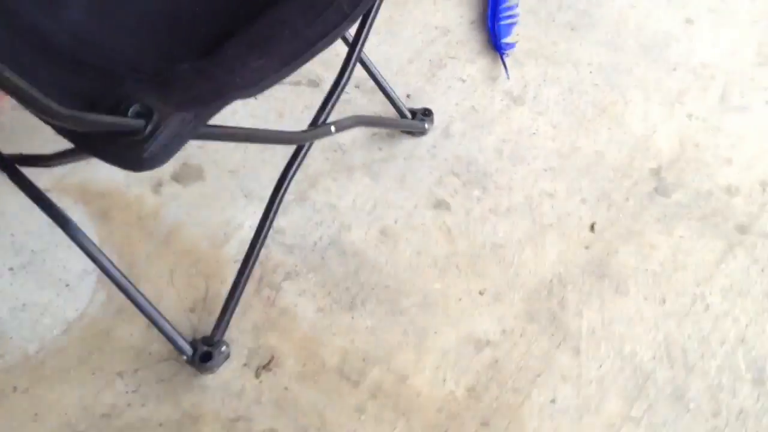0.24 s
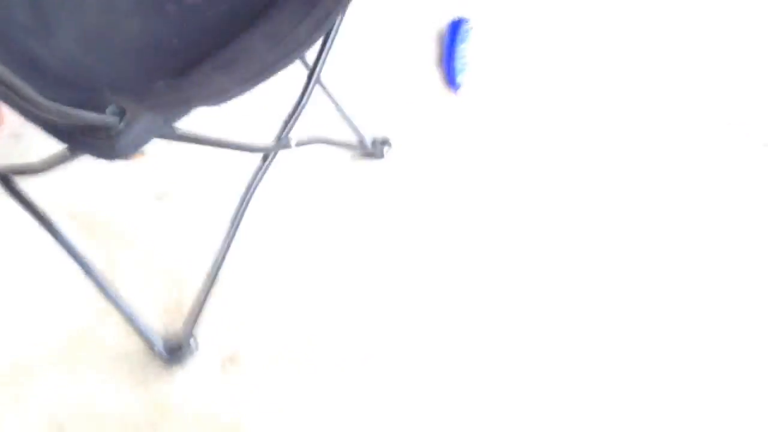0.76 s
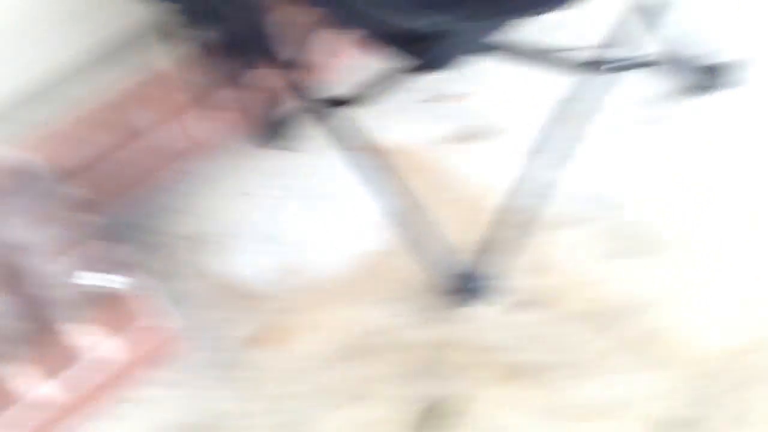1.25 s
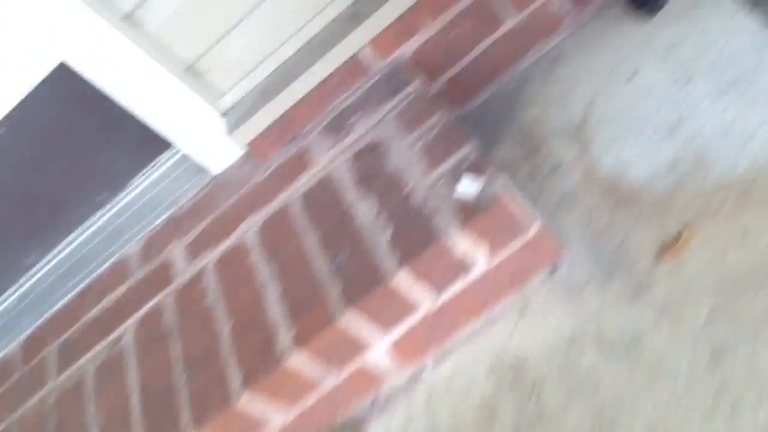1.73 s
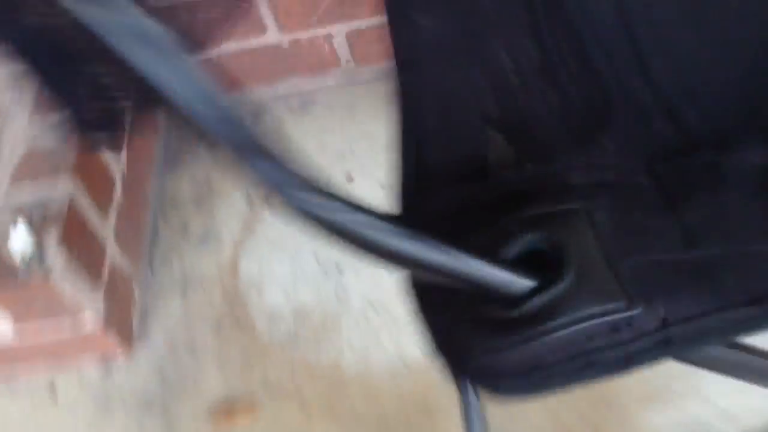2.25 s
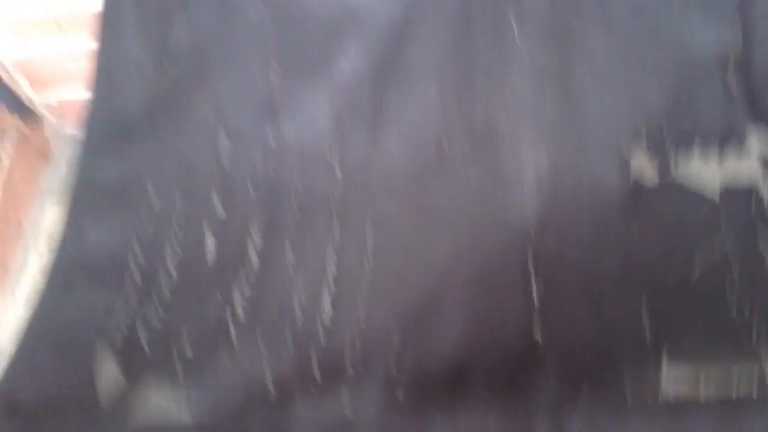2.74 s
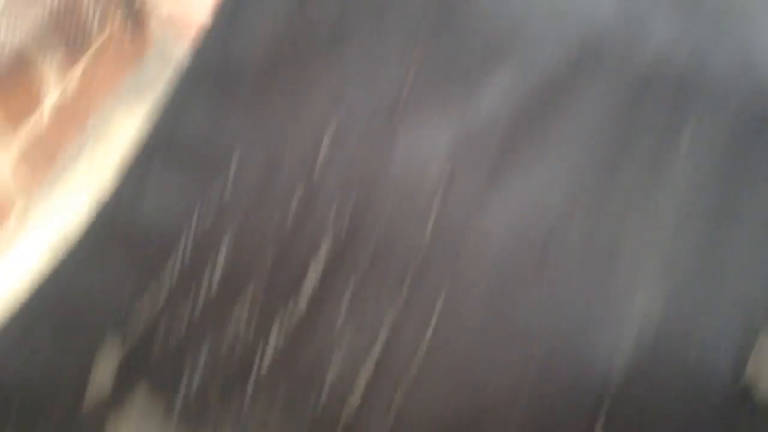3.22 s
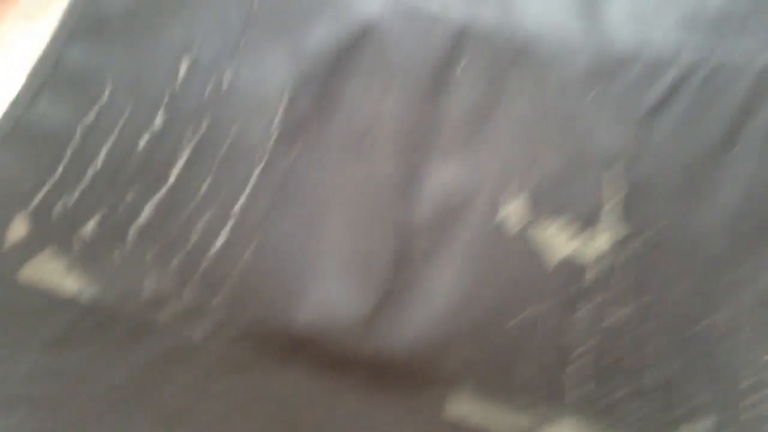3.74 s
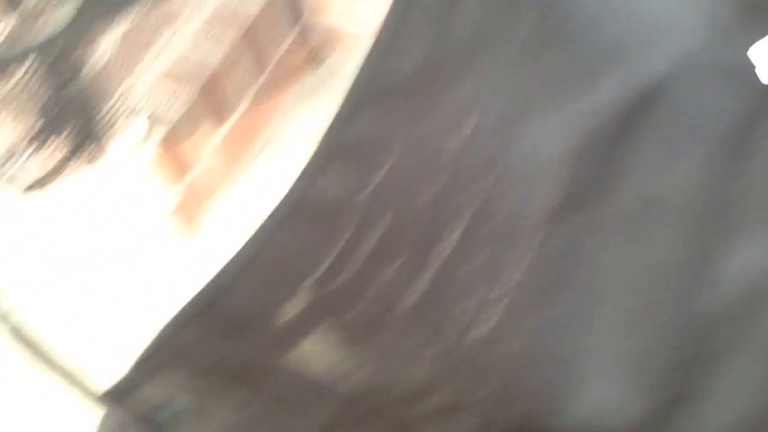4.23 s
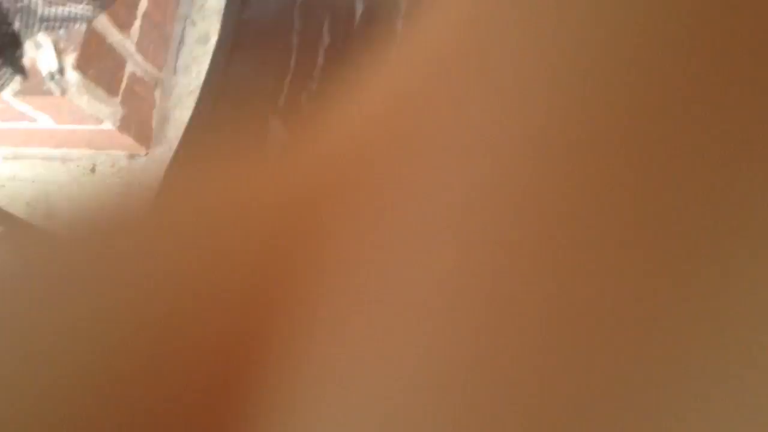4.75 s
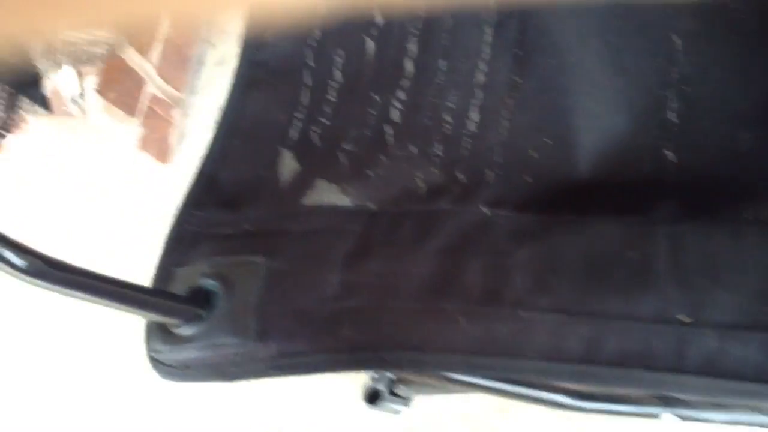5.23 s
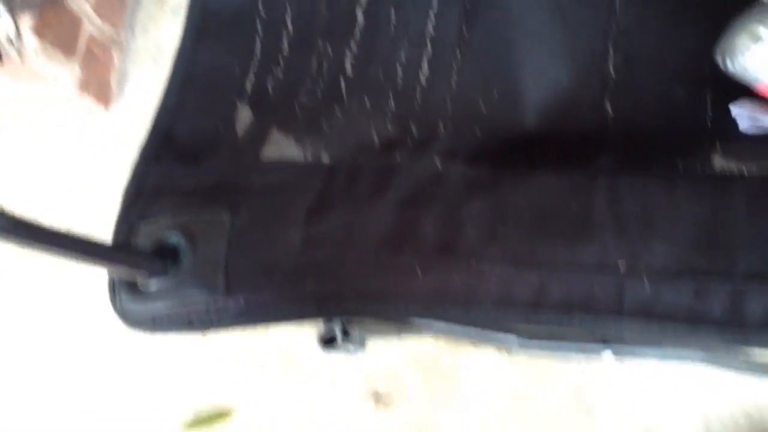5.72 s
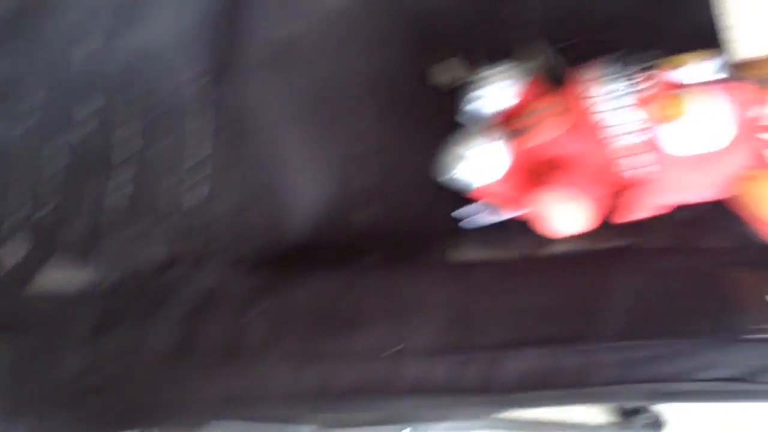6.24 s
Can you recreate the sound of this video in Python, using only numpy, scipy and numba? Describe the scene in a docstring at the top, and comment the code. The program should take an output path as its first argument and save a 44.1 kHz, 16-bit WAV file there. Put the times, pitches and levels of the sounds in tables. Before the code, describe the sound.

Very quiet outdoor air on a porch lies under everything. From about 0.6 to 1 second, fingers knock and rub on the handheld microphone in two loud, close, slightly overloaded clusters. Faint ticks and a soft cloth swish follow. At 2.4 seconds a plastic toy lands in a canvas folding chair with a clack and a thud, along with a handling bump, and fabric rasps faintly until 3 seconds. At 3.3 seconds a second toy lands much harder, thudding on the seat and briefly ringing the steel frame. A third, lighter drop comes at 4.3 seconds. Near 4.9 seconds a finger wipes across the microphone with a short, loud, muffled roar, followed by faint bumps as the grip shifts. Sharp, loud knocks and snaps hit the microphone around 5.8 to 5.9 seconds, then softer dull thumps continue until about 6.4 seconds.

```python
"""Toys dropped into a canvas chair

A handheld camera is carried across a porch while three toys land in a folding chair.
Each toy clacks, thuds on the canvas seat and rings the steel frame. Fingers knock, rub and slide
on the camera body and overload its microphone. Cloth swishes and small things tick in quiet air."""
import sys
import numpy as np
from scipy import signal
from scipy.fft import rfft, irfft
from scipy.io import wavfile
from scipy.ndimage import uniform_filter1d
from numba import njit

SR = 44100
rng = np.random.default_rng(int(sys.argv[2]) if len(sys.argv) > 2 else 0)


def file_out(sig):
    """Save sig as 16-bit WAV at sys.argv[1]."""
    # one column per channel
    cols = np.atleast_2d(sig).T
    # limit, then scale
    lim = np.clip(cols, -1, 1)
    pcm = np.round(lim * 32767).astype(np.int16)
    wavfile.write(sys.argv[1], SR, pcm)


N = 285755
T = np.arange(N) / SR
BASS_CUT_HZ, TOP_HZ = 142, 15200  # the range the microphone hears well
LEAD_S = 0.008  # a push starts this long before its peak


def amp(db):
    """Turn decibels into a gain."""
    return 10 ** (np.asarray(db) / 20)


def unit(x):
    """Scale a sound to an average (rms) level of 1."""
    return x / np.sqrt(np.mean(x ** 2))


def add(out, start, x):
    """Mix x into out, beginning at start seconds."""
    i = int(start * SR)
    out[i:i + len(x)] += x[:len(out) - i]


def fade(t60, size, hold_s=0):
    """Hold steady, then die away. The fade time t60 is the seconds it takes to fall 60 dB."""
    return amp(-60 * np.maximum(T[:size] - hold_s, 0) / t60)


def noise(colour, size, tilt_db=0):
    """Noise shaped by a table of Hz and dB, and brightened by tilt_db per octave."""
    octaves = np.log2(np.maximum(np.fft.rfftfreq(size, 1 / SR), 1))
    hz, db = np.transpose(colour)
    gains = amp(np.interp(octaves, np.log2(hz), db + tilt_db * np.log2(hz)))
    return unit(irfft(rfft(rng.standard_normal(size)) * gains, size))


def band(hz, width_hz, size):
    """Noise gathered around one pitch."""
    resonance = signal.iirpeak(min(hz, TOP_HZ), hz / width_hz, SR)
    return unit(signal.lfilter(*resonance, rng.standard_normal(size)))


def wander(rate, size):
    """A wobbly line that heads for a new random value rate times a second."""
    points = rng.standard_normal(int(size / SR * rate) + 2)
    return np.interp(T[:size] * rate, np.arange(len(points)), points)


@njit
def muffle(x, hz):
    """Soften the treble above a cutoff that can move over time."""
    y, state = np.empty(len(x)), 0.
    for i in range(len(x)):
        state += (1 - np.exp(-2 * np.pi * hz[i] / SR)) * (x[i] + 1e-18 - state)
        y[i] = state
    return y


def bass_cut(x):
    """The camera's steep bass filter, which rings after every push."""
    return signal.sosfilt(signal.butter(5, BASS_CUT_HZ, "high", fs=SR, output="sos"), x)


def push(cutoff_hz, size=2048):
    """A bell-shaped pulse. A softer push lasts longer and has a lower cutoff."""
    return np.exp(-(2 * np.pi * cutoff_hz * (T[:size] - LEAD_S)) ** 2 / np.log(4))


def thump(cutoff_hz):
    """One push on the camera body, heard through the bass cut, with a peak of 1."""
    x = bass_cut(-push(cutoff_hz))
    return x / np.abs(x).max()


# The tone of the outdoor air. Each row: frequency in Hz, level in dB.
AIR_COLOUR = [(24, -63), (40, -30), (108, -7.5), (273, -3), (387, -8), (472, -6.5), (591, -8), (1410, -12),
              (1860, -15.5), (3930, -18.5), (15500, -27.5)]
# Notes of the cupped hand. Each row: pitch in Hz, width in Hz, final level in dB, swell up to it in dB.
HAND_HOLLOW = [(150, 57, -48.5, 0), (3120, 290, -62, 2.5), (5066, 590, -65.5, 12.5)]


def outdoor_air(air_db=-54.5, shade_db=-2.5, shade_s=0.56, cup_start=4.82, cup_end=5.82):
    """Quiet air dips as a hand cups the microphone, and rings in the hollow as the grip closes."""
    shade = np.clip((T - cup_start) / shade_s, 0, 1)
    air = noise(AIR_COLOUR, N) * amp(air_db + shade_db * shade - 0.56 * wander(14, N))
    cupped = uniform_filter1d(1. * ((T > cup_start) & (T < cup_end)), size=4000)
    slack = np.interp(T, [cup_start, cup_end], [1, 0])
    hollow = sum(amp(db - swell_db * slack) * band(hz, width_hz, N)
                 for hz, width_hz, db, swell_db in HAND_HOLLOW)
    return air + cupped * bass_cut(hollow)


# Small contacts. Each row: start in seconds, level in dB, pitch in Hz, fade time in seconds.
LIGHT_TICKS = [(0.064, -45, 1550, 0.064), (1.626, -48, 3250, 0.069), (1.685, -39.5, 7400, 0.035),
               (1.699, -42, 10900, 0.11), (1.806, -48, 7550, .05), (1.937, -45.5, 6680, 0.06),
               (2.1248, -40.5, 1380, 0.045), (2.184, -43.5, 1420, 0.16), (2.535, -44.5, 9500, 0.13),
               (3.444, -39, 11300, 0.091), (4.3009, -24.5, 9200, 0.0047), (5.053, -46, 2980, .02),
               (5.191, -52, 7370, 0.022), (5.24, -43, 5870, 0.022), (5.402, -39.5, 3400, 0.041),
               (5.988, -37, 1100, 0.006), (6.1713, -41, 1290, 0.009), (6.37, -44, 850, 0.053)]


def ticks(size=8192):
    """Plastic, fingernails and grit touch lightly, each with a broad ring that dies quickly."""
    out = np.zeros(N)
    for start, db, hz, t60 in LIGHT_TICKS:
        add(out, start, amp(db) * band(hz, min(0.37 * hz, 6000), size) * fade(t60, size))
    return out


# The tone of brushed cloth. Each row: frequency in Hz, level in dB.
CLOTH_COLOUR = [(150, -14), (700, -6.5), (1600, -2.5), (2600, -3), (3900, -0.5), (6500, -7), (9000, -5),
                (15000, -23)]
# Brushes. Each row: start, rise and fall in seconds, level in dB, tilt in dB per octave.
CLOTH_BRUSHES = [(0.025, 0.066, 0.27, -57, -6), (0.693, 0.033, 0.097, -40.5, 0), (1.6, 0.31, 0.41, -54, -4),
                 (2.12, 0.036, 0.12, -46, -1), (2.68, 0.21, 0.078, -43, 0), (2.96, 0.081, 0.033, -49, -4),
                 (3.201, 0.0054, 0.063, -33.5, 0), (3.208, 0.079, 0.12, -48.5, -2),
                 (4.155, .008, 0.028, -52.5, 8), (4.745, 0.013, 0.2, -50.5, 5.5)]


def swishes(weave_db=2.5, size=32768):
    """Canvas and clothes brush past: each swish swells and dies away, grainy with the weave."""
    out = np.zeros(N)
    for start, rise, fall, db, tilt_db in CLOTH_BRUSHES:
        speed = np.interp(T - start, [0, rise, rise + fall], [0, 1, 0])
        grain = noise(CLOTH_COLOUR, size, tilt_db) * amp(weave_db * wander(300, size))
        out += amp(db) * speed * np.resize(grain, N)
    return out


def rasp(hz, width_hz):
    """Threads scraping: noise gathered around a pitch that moves."""
    a, b = signal.lfilter(*signal.butter(2, width_hz / 2, fs=SR), rng.standard_normal((2, N)))
    phase = 2 * np.pi * np.cumsum(hz) / SR
    return unit(a * np.cos(phase) + b * np.sin(phase))


def sleeve_slide(start=2.55, peak=2.875, end=2.95, db=-43.5, weave_db=2.5, snag_db=2):
    """A sleeve snags along the canvas, pressing harder and rasping higher as it speeds up."""
    contact = np.interp(T, [start, peak, end], [1, 1, 0], left=0)
    pressure = contact * amp(32 * np.minimum(T - peak, 0))  # swells 32 dB a second
    hz = 3730 * 2 ** (0.45 * (np.clip(T, start, peak) - start))  # climbs 0.45 octaves a second
    threads = rasp(hz, width_hz=2300) + amp(-9.5) * rasp(2 * hz, width_hz=3200)
    return amp(db + weave_db * wander(300, N) + snag_db * wander(45, N)) * pressure * threads


def fidget(start=4.5, end=5.8, db=-40, cutoff_hz=159, count=20):
    """Faint bumps of uneven spacing, strength and sharpness as the hand shifts its hold."""
    out = np.zeros(N)
    for k, (late, strength, sharpness) in enumerate(rng.standard_normal((count, 3))):
        at = start + (end - start) * (k + late / 2) / count
        add(out, at, amp(db + 3 * strength) * thump(cutoff_hz * np.exp(0.25 * sharpness)))
    return out


def judder(at=6.0925, first_gap_s=0.0175, slowing=1.25, first_db=-24, step_db=1.15):
    """A fingertip judders to a stop in four slips, each stronger and after a longer wait."""
    out = np.zeros(N)
    for k in range(4):
        add(out, at - LEAD_S, amp(first_db + k * step_db) * thump(cutoff_hz=153))
        at += first_gap_s * slowing ** k
    return out


# Soft contacts. Each row: time in seconds, peak level in dB, cutoff in Hz (lower is duller).
SOFT_BUMPS = [(0.064, -40, 260), (0.168, -42, 170), (0.328, -40.5, 167), (0.444, -29.5, 447),
              (0.575, -37.5, 217), (0.6376, -5, 697), (0.658, -8, 260), (0.6737, -14, 634),
              (.788, -24, 300), (0.863, -28, 330), (0.882, -4, 340), (.926, -11, 650), (1.179, -44.5, 186),
              (2.375, -13, 644), (2.383, -11, 200), (2.494, -24.5, 327), (2.502, -20, 287),
              (3.22, -31, 400), (3.4366, -17.5, 785), (4.28, -20.5, 455), (5.242, -26.5, 346),
              (5.402, -21.5, 746), (5.711, -33, 508), (5.8612, -1.5, 308), (5.8702, -8, 330),
              (5.9907, -24.5, 204.4), (6.2266, -13, 222), (6.3294, -14.5, 197)]


def bumps():
    """Fingertips, and toys settling on the canvas, touch so softly that they only thump."""
    out = np.zeros(N)
    for at, db, cutoff_hz in SOFT_BUMPS:
        add(out, at - LEAD_S, amp(db) * thump(cutoff_hz))
    return out


# The tone of the grit in a rub. Each row: frequency in Hz, level in dB.
GRIT_COLOUR = [(500, 0.5), (1400, -3.5), (2800, -12.5), (6000, -33.5)]
# Strokes on the camera. Each row: start and length in seconds, level in dB, fade in dB, cutoff in Hz.
SKIN_STROKES = [(0.44, 0.044, -35, 8, 168), (0.676, 0.026, -19, 5, 327.5), (0.711, 0.15, -28, 12, 260),
                (0.898, 0.035, -14, 4, 459), (4.699, .11, -48, 0, 162), (5.43, 0.025, -39.5, -0.5, 134.7),
                (5.521, 0.033, -38.5, 0, 128), (5.921, 0.0098, -26, 10.5, 660), (6.01, 0.16, -47, -9, 162)]


def rubs(slips_per_hz=1.3, scatter_db=2.5, tail_s=0.07, release_db_per_s=540.5):
    """Skin sticks and slips in uneven little thumps, closer together and grittier when sharper."""
    out = np.zeros(N)
    for start, length, db, fade_db, hz in SKIN_STROKES:
        gap, strength, sharpness, direction = rng.standard_normal((120, 4)).T
        times = np.cumsum(np.exp(gap / 2))
        times = (times - times[0]) / (slips_per_hz * hz)
        times = times[times < length + tail_s]
        overrun = np.maximum(times - length, 0)
        gains = amp(-fade_db * np.minimum(times / length, 1) - release_db_per_s * overrun)
        cutoffs = hz * 2 ** (-71 * overrun)  # the tail dulls by 71 octaves a second
        stroke = np.zeros(SR // 2)
        for k, gain in enumerate(gains):
            slip = thump(cutoffs[k] * np.exp(0.36 * np.tanh(sharpness[k])))
            add(stroke, times[k], gain * np.sign(direction[k]) * amp(scatter_db * strength[k]) * slip)
        loudness = uniform_filter1d(np.abs(stroke), size=100)
        stroke += amp(-21) * (hz / 420) ** 2 * loudness * noise(GRIT_COLOUR, len(stroke))
        energy = (length + tail_s) * SR * np.mean(gains ** 2)
        add(out, start - LEAD_S, amp(db) * stroke * np.sqrt(energy / np.sum(stroke ** 2)))
    return out


# The tone of sliding skin. Each row: frequency in Hz, level in dB.
SKIN_COLOUR = [(100, -8.5), (300, -3), (1500, -2.5), (4000, -2.5), (8000, -2.5), (15000, -13)]


def wipe(start=4.8485, db=-5, seal_s=0.016, hold_s=0.054, open_hz=5660, sealed_hz=450, slip_hz=311):
    """A finger wipes over the microphone hole: its hiss darkens to a juddering roar as the hole seals."""
    t = T - start
    sealed = np.clip(t / seal_s, 0, 1)
    cutoff = open_hz * (sealed_hz / open_hz) ** sealed
    hiss = noise(SKIN_COLOUR, N) * amp(2 * wander(600, N))
    friction = muffle(muffle(hiss, cutoff), 9 * cutoff)
    friction = bass_cut(friction) + amp(-22) * friction  # a little slow pressure gets past the bass cut
    friction /= np.sqrt(uniform_filter1d(friction ** 2, size=700))  # even out the level
    slip_rate = slip_hz * np.exp(0.17 * wander(300, N))
    slips = signal.sawtooth(2 * np.pi * np.cumsum(slip_rate) / SR)
    slips = unit(muffle(slips, hz=np.full(N, 700.)))
    grip = amp(-3.5) * sealed ** 2
    roar = (friction + grip * slips) / np.hypot(1, grip) * amp(2 * wander(130, N))
    # Three slopes in dB a second: the finger lands, eases off, then lifts away.
    attack = 1745.5 * np.maximum(-t, 0)
    release = 439.5 * np.maximum(t - hold_s, 0)
    lift = 950 * np.maximum(t - hold_s - 0.053, 0)
    return roar * amp(db - attack - release - lift)


def ring(notes, size):
    """Struck notes fade, neighbours swinging opposite ways, a little detuned by where the blow lands."""
    out = np.zeros(size)
    for k, (hz, db, t60) in enumerate(notes):
        detuned_hz = hz * (1 + 0.0032 * rng.standard_normal())
        out += (-1) ** k * amp(db) * np.sin(2 * np.pi * detuned_hz * T[:size]) * fade(t60, size)
    return out


# The tone of clacking plastic. Each row: frequency in Hz, level in dB.
CLACK_COLOUR = [(150, -2.5), (400, -0.5), (1100, -3.5), (2200, -8), (4500, -9.5), (9000, -11.5),
                (15000, -16.5)]


def toy_clack(tilt_db, size, shell_db=-19, porch_db=-15):
    """Plastic clacks, the toy's hollow shell rings, and the porch walls send the clack back."""
    clack = noise(CLACK_COLOUR, size, tilt_db) * amp(2 * wander(930, size)) * fade(0.068, size)
    shell_notes = [(1000 * 2 ** octave, (tilt_db - 2) * octave, 0.058)
                   for octave in rng.uniform(0, 3.8, 22)]
    shell = ring(shell_notes, size)
    porch = noise(CLACK_COLOUR, size, tilt_db + 1.27) * fade(0.32, size)
    return clack + amp(shell_db) * shell + amp(porch_db) * porch


# Notes of the taut seat and the steel tubes. Each row: pitch in Hz, level in dB, fade time in seconds.
SEAT_NOTES = [(200, -10.5, 0.12), (269, 3.5, 0.12), (352, -9, 0.12), (637, -11, 0.042), (822, 1.5, 0.03),
              (1143, -3, 0.034), (1496, -10.5, 0.046)]
FRAME_NOTES = [(274, -2.5, 0.67), (290, -6, .3), (395, -2, 0.22), (797, -6.5, 0.38), (862, -8, .44),
               (1147, -12, 0.2), (1440, -17, 0.32), (2580, -25, 0.17), (3112, -23, 0.29)]
# Landings. Each row: start in seconds, thud level in dB (before halving), frame and clack levels in dB,
# clack tilt in dB per octave, seconds until the second blow, its gain over the first in dB,
# seconds until the seat gives, pitch of the toy's body in Hz.
TOY_LANDINGS = [(2.3695, -22, -41, -18, -2.5, .0042, 5.5, .0055, 510),
                (3.3478, -2.5, -23.5, -7.5, -3, 0.0057, -20, .0001, 432),
                (4.301, -18, -39.5, -20.5, -5.5, .0054, 7, .0001, 428)]


def toy_drops(overload_thump_db=-27, size=32768):
    """A toy lands on one edge and rocks onto the other; the seat thuds and the frame rings unsteadily."""
    blows, overload = np.zeros((2, N))
    for start, thud_db, frame_db, clack_db, tilt_db, rock_s, second_db, give_s, body_hz in TOY_LANDINGS:
        for at, blow_db in (start, 0), (start + rock_s, second_db):
            thud = ring(SEAT_NOTES, size) + ring([(body_hz, 5, 0.042)], size)
            frame = ring(FRAME_NOTES, size) * amp(2 * wander(50, size))
            add(blows, at + give_s, amp(blow_db) * (amp(thud_db) * thud / 2 - amp(frame_db) * frame))
            add(blows, at, amp(clack_db + blow_db) * toy_clack(tilt_db, size))
        # A faint deep thump under each landing, as the microphone overloads.
        add(overload, start + give_s - LEAD_S, amp(thud_db + overload_thump_db) * push(cutoff_hz=60))
    return bass_cut(blows) + overload


# The tone of skin crunching on the camera. Each row: frequency in Hz, level in dB.
CRUNCH_COLOUR = [(150, 7.5), (1100, 7.5), (1900, 0), (4000, -4.5), (8000, -17), (15000, -29)]


def crunch(size, tilt_db=0):
    """The rough noise of skin catching right beside the microphone."""
    return noise(CRUNCH_COLOUR, size, tilt_db)


# Snaps during the knocks. Each row: start in seconds, level in dB.
SKIN_SNAPS = [(0.6312, -15), (0.6362, -17.5), (0.8808, -15.5), (0.8905, -13), (5.8262, -10.5),
              (5.8778, -13)]


def snaps(size=8192):
    """Skin catches or breaks free with a sharp snap."""
    out = np.zeros(N)
    for start, db in SKIN_SNAPS:
        snap = crunch(size, tilt_db=0.5) * fade(0.012, size, hold_s=0.002)
        add(out, start, bass_cut(amp(db) * snap))
    return out


# Hard knocks. Each row: start in seconds, click, crack and strike levels in dB, strike cutoff in Hz,
# seconds until the press, press level in dB, skid length in seconds, skid level in dB,
# level of the overload boom compared with each thump in dB.
FINGER_KNOCKS = [(0.6221, 1.5, -4, 6, 710, 0.0084, -1, 0.016, -16, -19.5),
                 (0.8743, -21.5, -22, -16.5, 300, 0.013, 4, 0.016, -19.5, -17.5),
                 (5.825, -10, -4, -2, 280, 0.0532, 2.5, 0.053, -15, -25),
                 (5.9085, -25, -11.5, 2.5, 410, .0105, 0.5, 0.0057, -8, -18.5)]


def knocks(press_hz=237.6, boom_hz=65, grit_db=4, swell_db_per_s=149, size=8192):
    """A nail strikes the camera, the flesh presses after it, and the finger skids until it grips."""
    out = np.zeros(N)
    for (start, click_db, crack_db, strike_db, strike_hz,
         press_s, press_db, skid_s, skid_db, boom_db) in FINGER_KNOCKS:
        # A deep boom under each thump, as the microphone overloads.
        overload_boom = amp(boom_db) * push(boom_hz)
        for delay, db, hz in (0, strike_db, strike_hz), (press_s, press_db, press_hz):
            add(out, start + delay - LEAD_S, amp(db) * (thump(hz) - overload_boom))
        bearing_down = amp(swell_db_per_s * np.minimum(T[:size] - skid_s, 0))
        skid = amp(skid_db) * bearing_down * fade(0.04, size, hold_s=skid_s)
        crack = amp(crack_db) * fade(0.03, size)
        grit = unit(crunch(size) * amp(grit_db * wander(1500, size)))
        click = amp(click_db) * band(hz=7660, width_hz=4000, size=size) * fade(0.0044, size)
        add(out, start, bass_cut(click + grit * np.hypot(crack, skid)))
    return out


def scene():
    """Mix the hand on the camera with the chair and the porch behind it, in one channel."""
    handling = knocks() + snaps() + bumps() + judder() + fidget() + rubs() + wipe()
    porch = toy_drops() + bass_cut(swishes() + sleeve_slide() + ticks()) + outdoor_air()
    return (handling + porch)[None]


def record(dry):
    """The microphone overloads on the hardest knocks, dulls the treble and cuts off the very top."""
    squashed = dry / (1 + dry ** 8) ** (1 / 8)
    dulled = signal.lfilter(*signal.butter(2, TOP_HZ, fs=SR), squashed)
    return signal.sosfilt(signal.ellip(8, .2, 80, TOP_HZ, fs=SR, output="sos"), dulled)


dry = scene()
out = record(dry)
file_out(out)
```